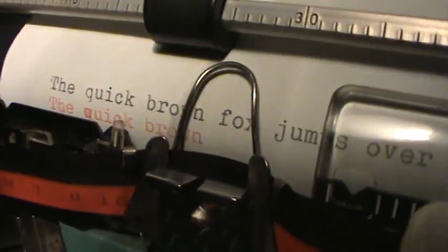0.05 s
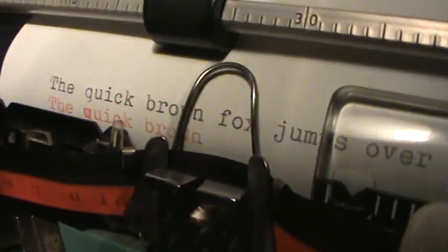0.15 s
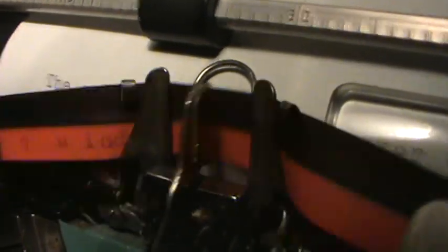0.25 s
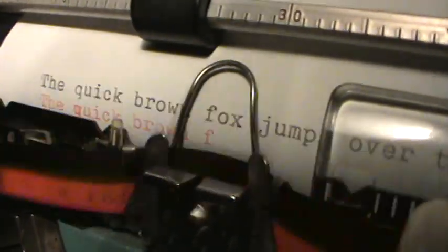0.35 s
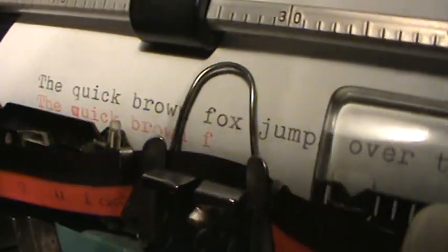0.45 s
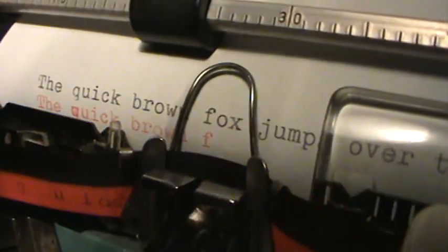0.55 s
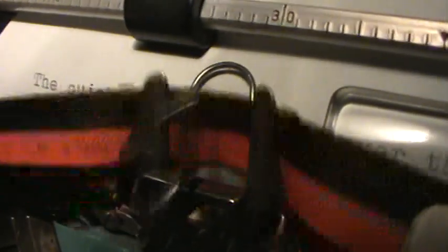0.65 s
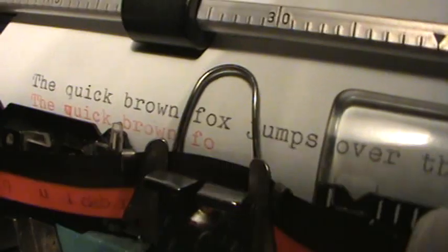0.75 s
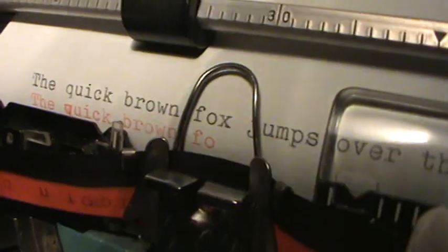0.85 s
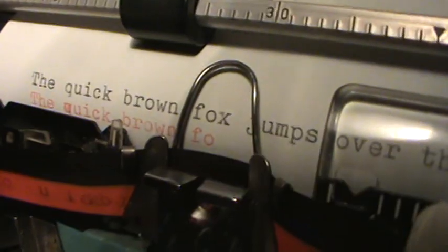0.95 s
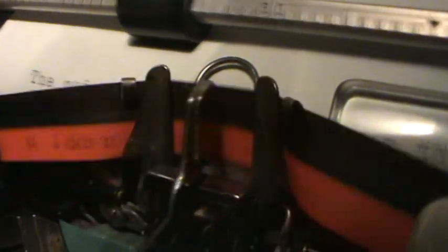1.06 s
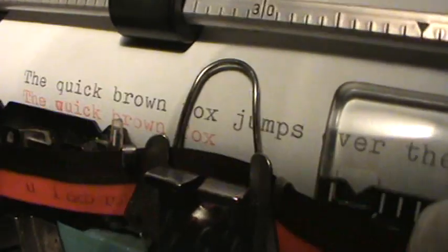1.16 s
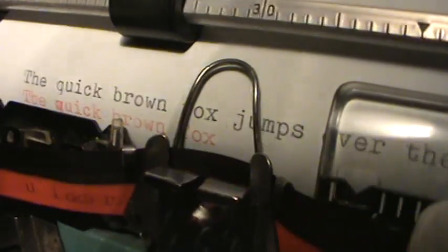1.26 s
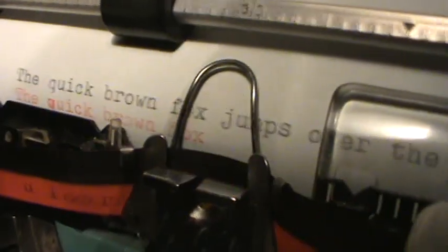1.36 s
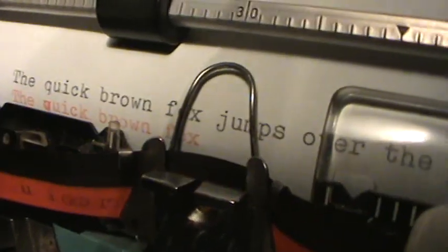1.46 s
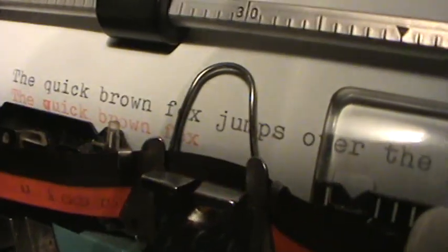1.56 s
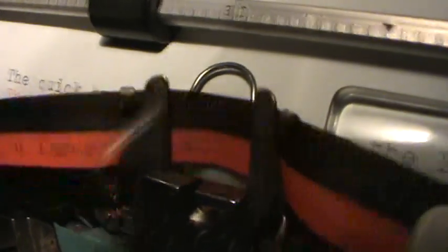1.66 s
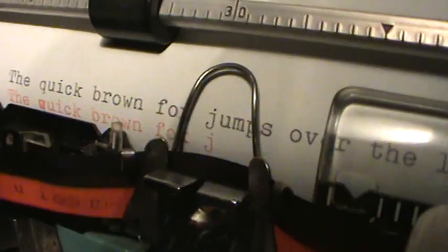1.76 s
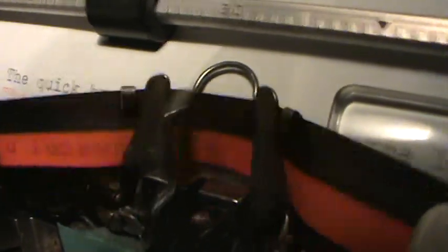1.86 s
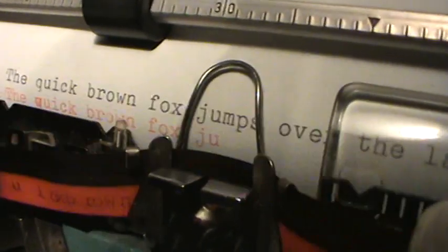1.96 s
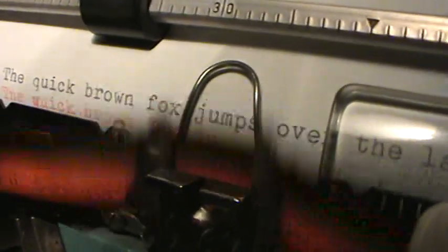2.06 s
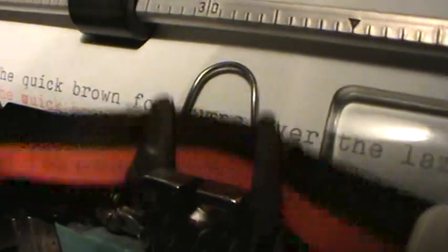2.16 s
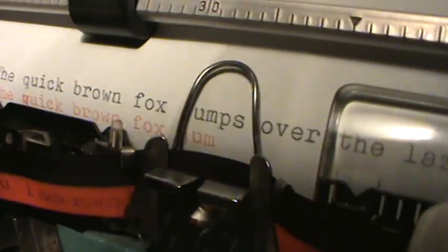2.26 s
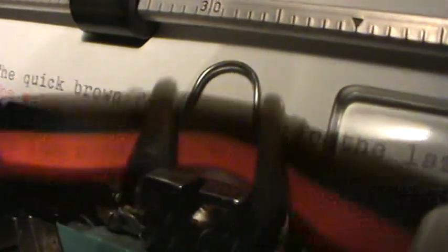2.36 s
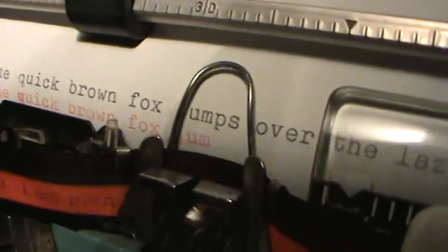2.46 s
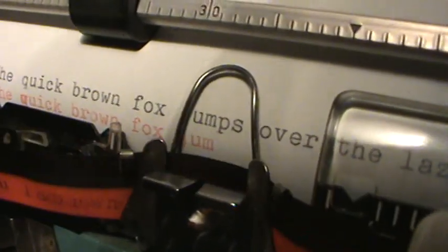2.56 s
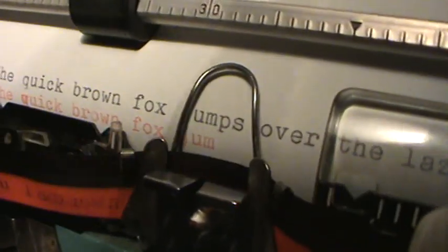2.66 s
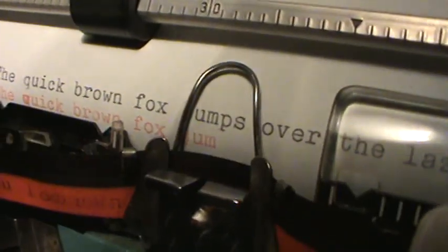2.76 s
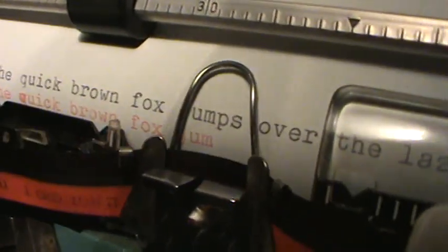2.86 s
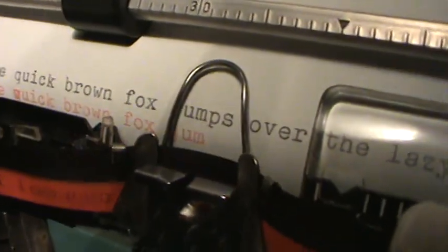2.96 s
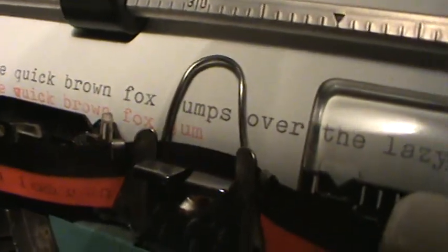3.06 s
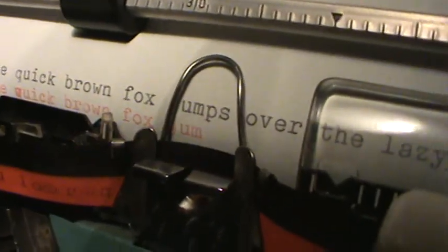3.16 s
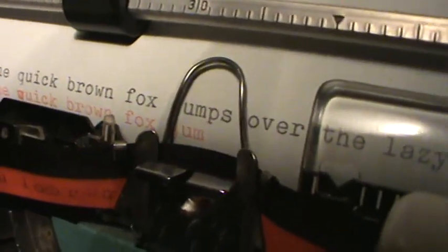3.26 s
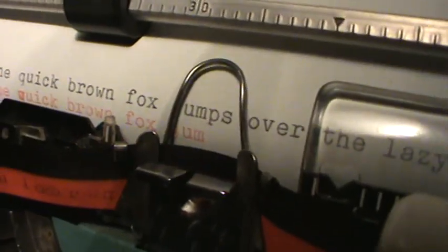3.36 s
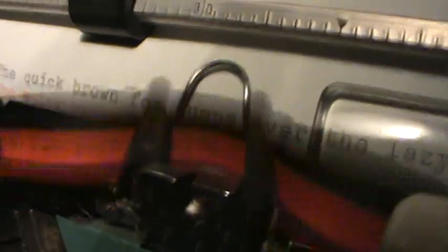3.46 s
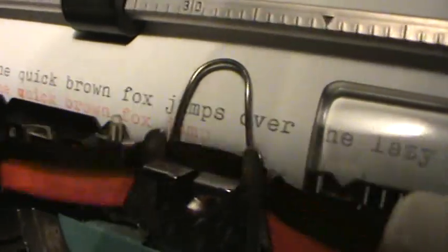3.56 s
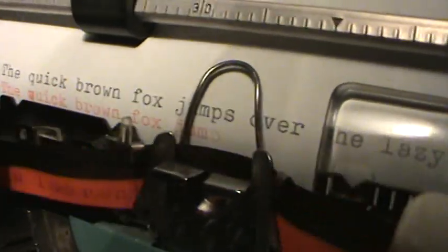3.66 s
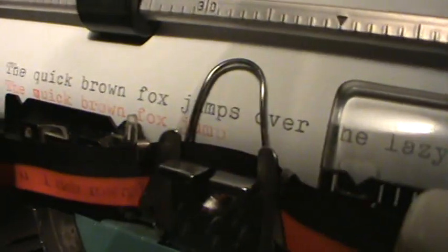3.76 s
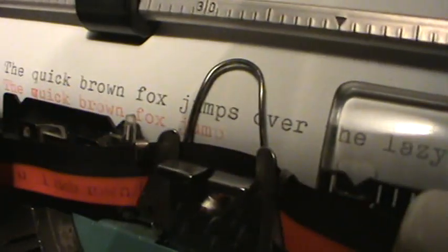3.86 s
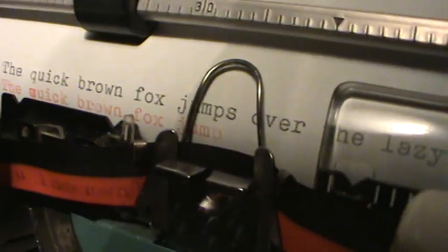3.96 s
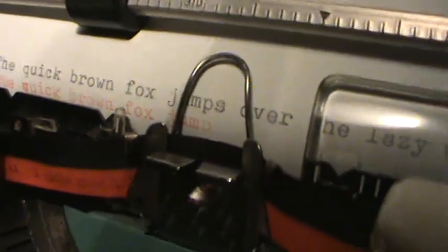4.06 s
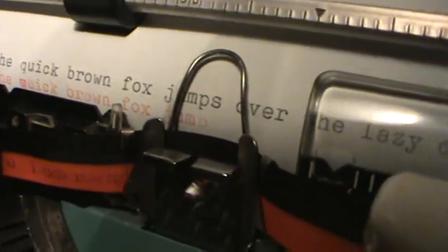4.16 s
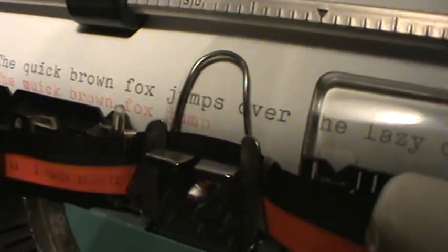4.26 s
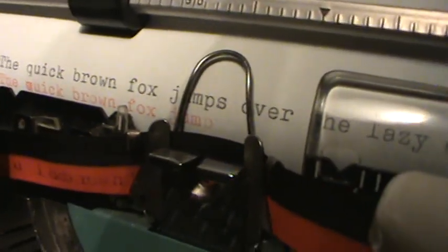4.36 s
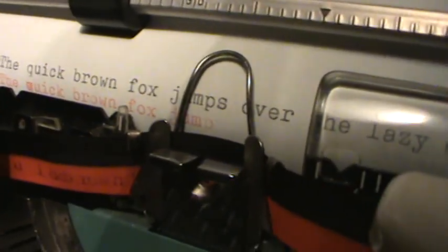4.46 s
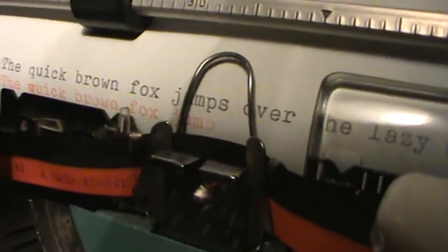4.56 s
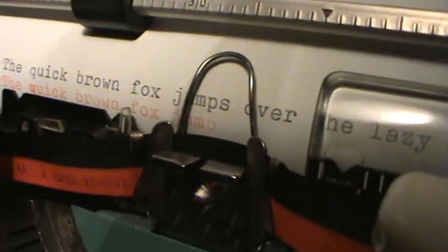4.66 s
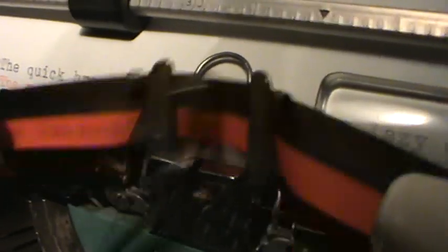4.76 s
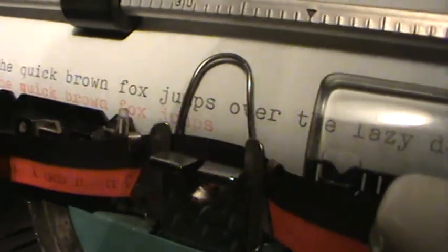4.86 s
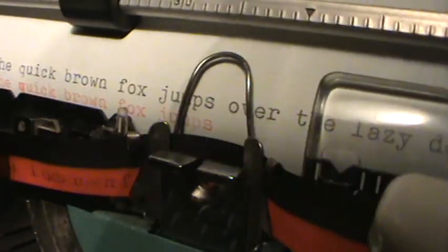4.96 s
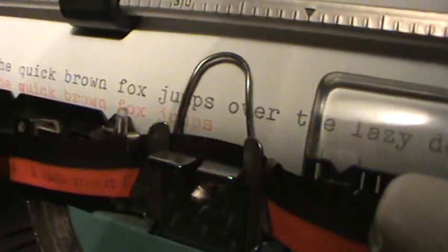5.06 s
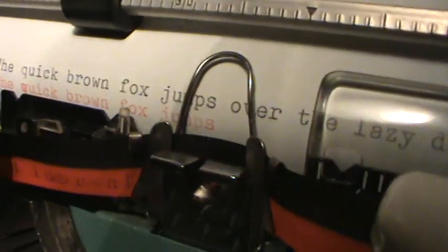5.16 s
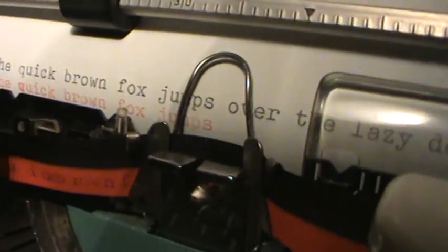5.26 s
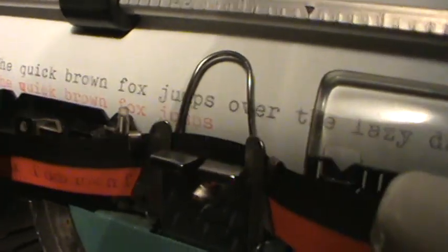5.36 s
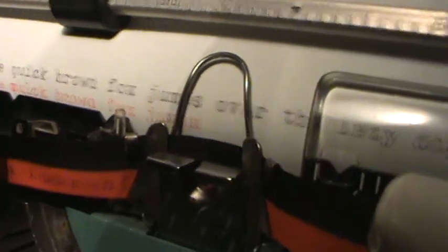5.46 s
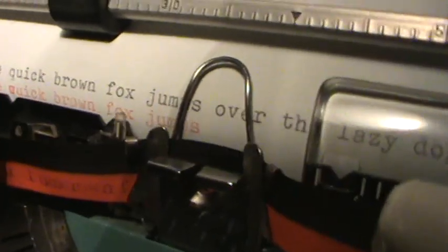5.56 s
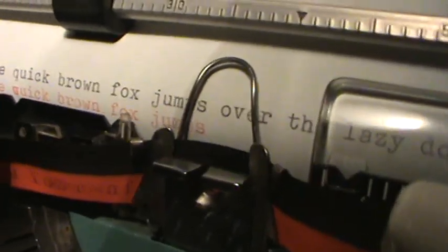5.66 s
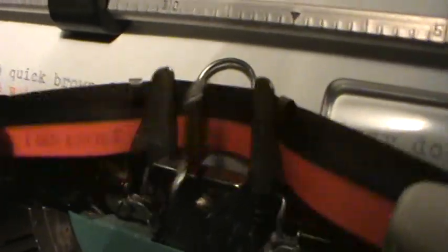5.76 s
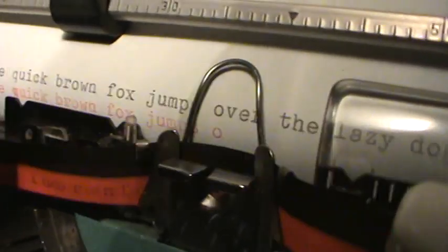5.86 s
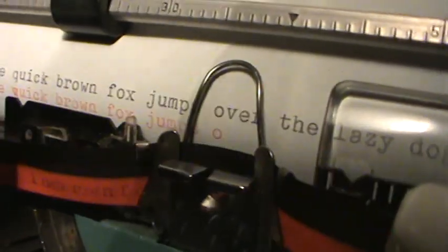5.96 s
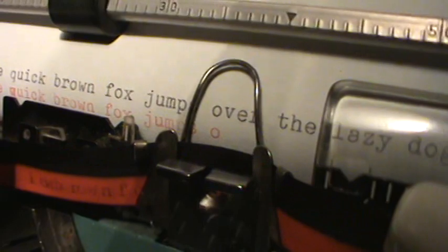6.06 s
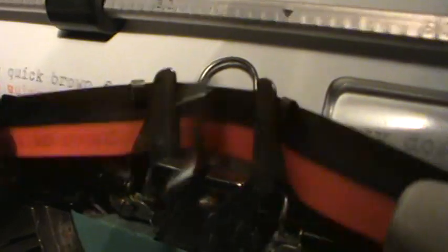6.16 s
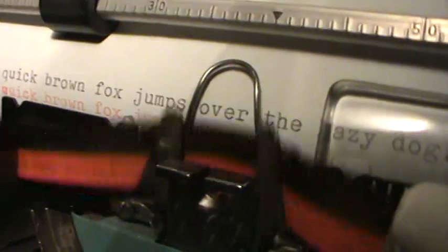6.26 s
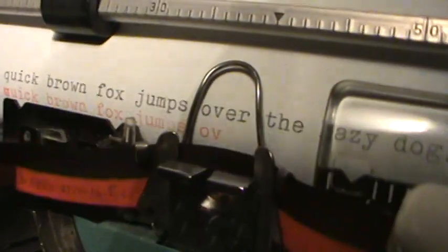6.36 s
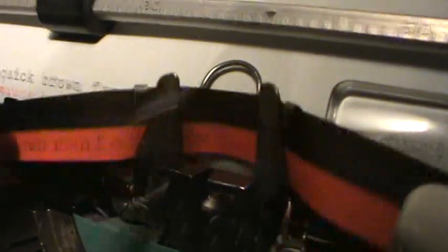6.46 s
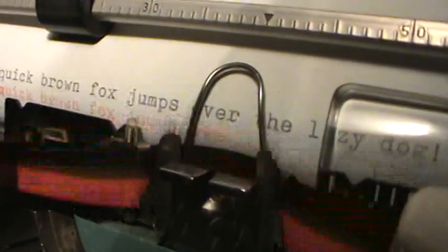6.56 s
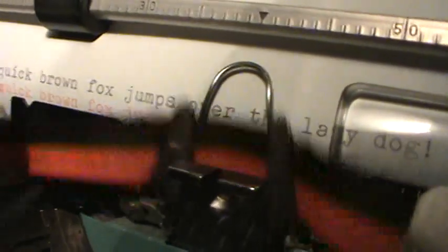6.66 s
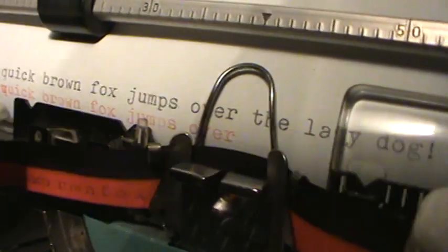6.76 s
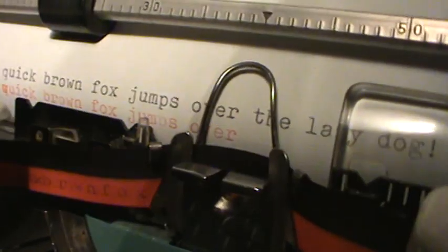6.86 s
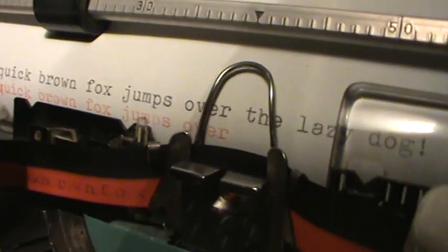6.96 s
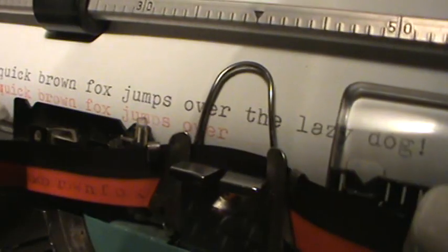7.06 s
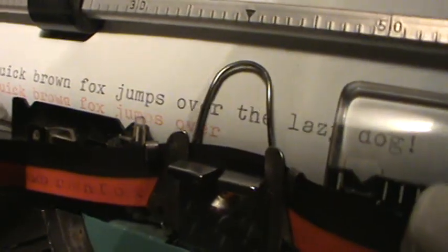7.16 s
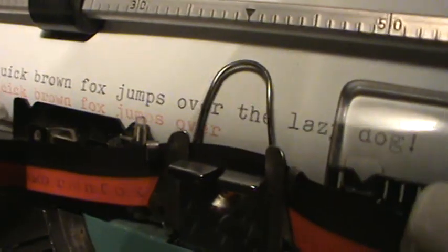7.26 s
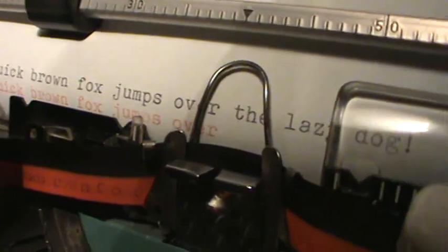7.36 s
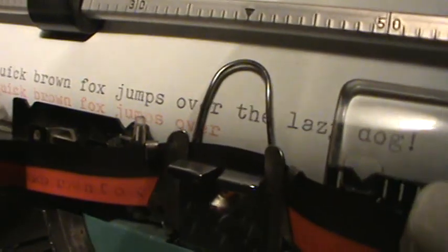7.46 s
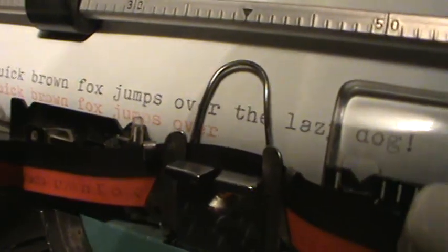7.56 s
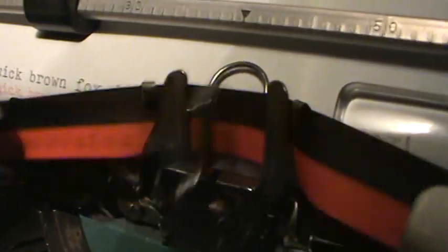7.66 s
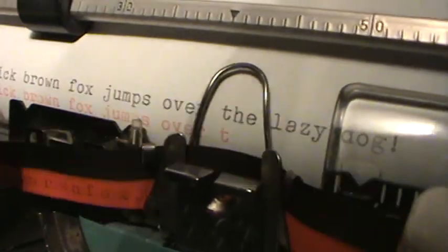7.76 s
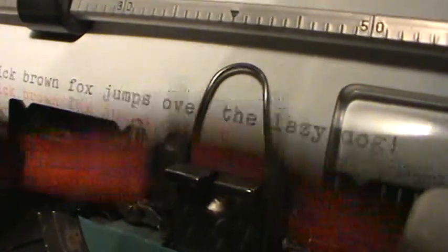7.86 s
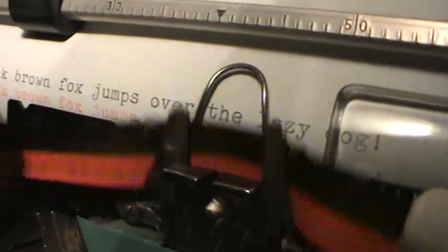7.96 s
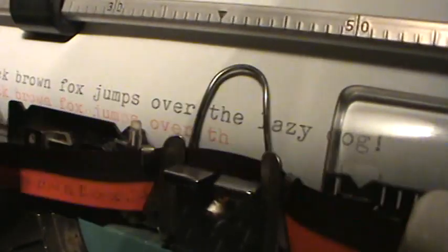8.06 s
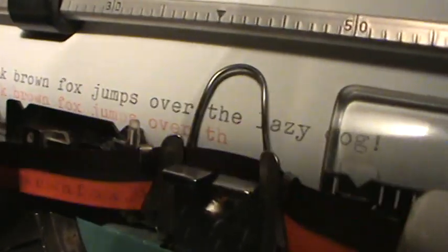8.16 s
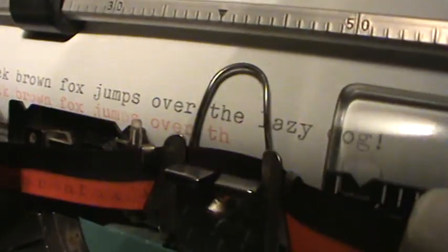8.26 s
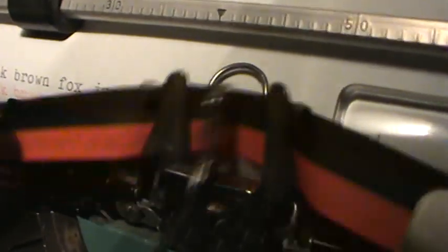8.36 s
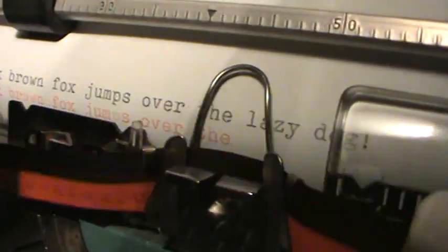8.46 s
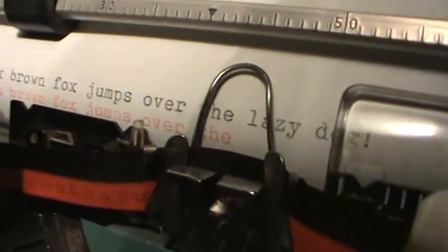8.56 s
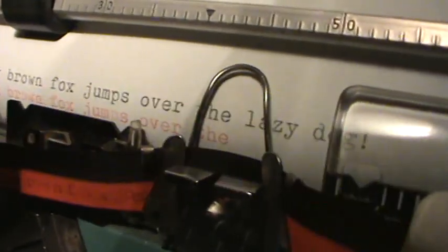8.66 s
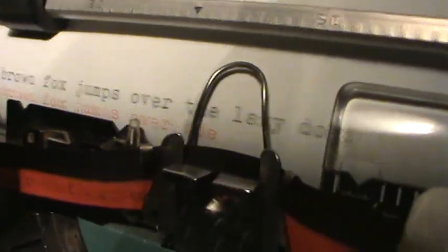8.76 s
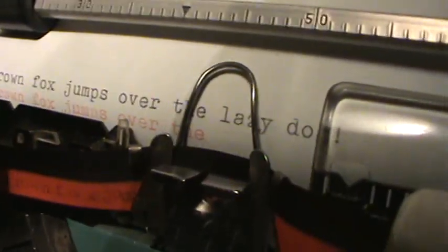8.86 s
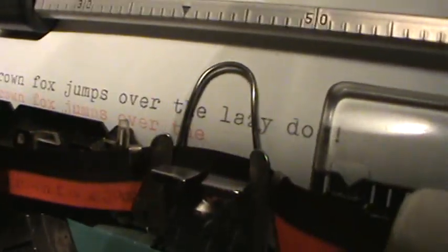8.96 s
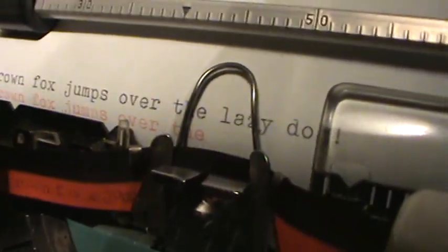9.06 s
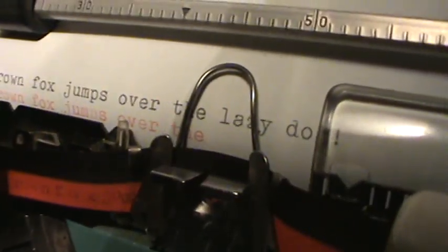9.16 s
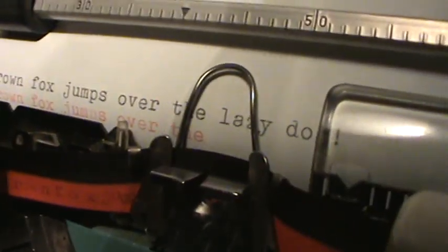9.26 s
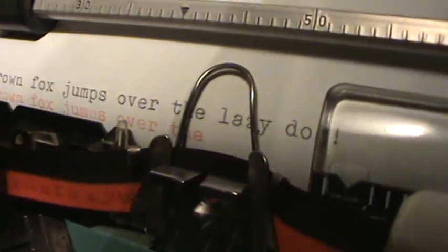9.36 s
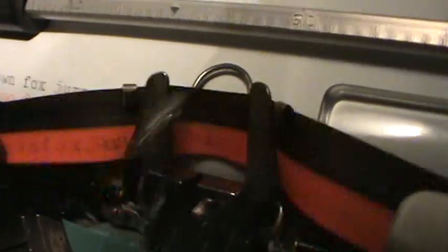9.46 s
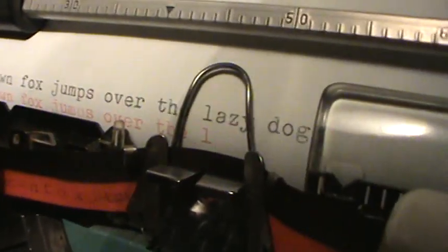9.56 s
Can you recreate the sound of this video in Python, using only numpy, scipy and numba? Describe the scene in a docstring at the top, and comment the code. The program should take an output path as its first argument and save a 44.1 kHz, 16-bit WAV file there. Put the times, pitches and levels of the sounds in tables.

```python
"""Slow typing on a manual typewriter, heard close up in a small room, over a low hum and faint steady ticks.
From the start, letters rattle the key linkage, slap the platen and drop the typebar; the carriage clicks along.
The first space soon thumps the frame. Then come loose clicks, soft slides, a faint spring tone and light taps,
and the typing goes on to the end. Blows are shaped noise with clear ringing tones, the hum is sines over air
noise, the ticks are noise bursts. A limiter holds the loud blows down."""
import sys
import numpy as np
from scipy import signal
from scipy.fft import rfft, irfft, next_fast_len
from scipy.io import wavfile
from numba import njit

SR = 44100
rng = np.random.default_rng(int(sys.argv[2]) if len(sys.argv) > 2 else 0)


def store_wav(level_fs):
    """Save 16-bit WAV to argv[1]."""
    pcm = np.round(np.clip(np.atleast_2d(level_fs), -1, 1) * 32767)
    wavfile.write(sys.argv[1], SR, pcm.T.astype(np.int16))


N = 424241  # length of the scene in samples


def typewriter():
    """The parts of the machine and the desk under it, each with its own weight and looseness, struck by their
    own contacts."""
    # colour of each part's noise, as (frequency [Hz], relative level [dB])
    key_colour = [(40, -7.5), (110, 11), (250, 0), (400, -4.5), (750, -7.5), (1400, -5), (2300, 1.5),
                  (4200, -5.5), (7000, -3.5), (11000, -4), (16000, -9.5)]
    strike_colour = [(40, -19.5), (90, 2), (150, 0), (250, 0.5), (380, -4.5), (650, 4.5), (1200, 2.5),
                     (2000, 0), (3100, 2.5), (6000, 0), (10000, -1), (16000, -10)]
    return_colour = [(40, -7), (90, 6), (300, 5), (700, -2.5), (1000, 6), (2000, 1.5), (4500, 5),
                     (8000, 1.5), (12000, 0), (16000, -5)]
    thump_colour = [(40, -18.5), (80, 3.5), (150, 0.5), (290, 2.5), (380, -9), (570, 4), (800, -6.5),
                    (1200, -10), (1500, -8.5), (2300, -18.5), (8000, -28), (16000, -43)]
    click_colour = [(60, -13), (400, 1), (1200, 1), (3000, -0.5), (5800, -0.5), (7700, -1.5), (9500, 0.5),
                    (16000, -21)]
    tap_colour = [(50, -6), (110, 7), (190, 8), (330, -1.5), (600, -6), (1100, -1.5), (1700, -2.5),
                  (2500, -11), (5000, -18), (16000, -33)]
    # what each part rings with: (frequency [Hz], relative level [dB], time to fall 60 dB at length factor 1 [s])
    key_modes = [(2210, -39, 0.17), (2440, -30, 0.03), (3140, -11, 0.097), (5830, -16, 0.086),
                 (6540, -7.5, 0.13), (9360, -9.5, 0.1), (10800, -12.5, 0.039)]
    platen_modes = [(147.3, -18.5, 0.57), (699, -33.5, 0.13), (917, -17.5, 0.15), (1055, -24.5, 0.4),
                    (1490, -22.5, 0.31), (1690, -20, 0.19), (4870, -32, .1), (12800, -16, 0.074)]
    typebar_modes = [(991, -21, 0.14), (1560, -28.5, 0.2), (3230, -25.5, 0.13), (4330, -19, 0.031),
                     (5500, -22.5, 0.049), (9570, -15.5, 0.056), (11900, -20, 0.049), (12900, -42, 0.17)]
    frame_modes = [(141, -8.5, 0.43), (284.6, -11.5, 0.16), (515, -12, 0.16), (578, -12, 0.087),
                   (902, -17, 0.28), (1480, -22, 0.14)]
    pawl_modes = [(5850, -21, .05)]
    desk_modes = [(184, -10, 0.09), (1740, -19.5, .04)]
    # fingers stir loose levers between strokes:
    # (time [s], level before the part's gain [dB], tilt [dB per octave], rattle length factor)
    loose_clicks = [(2.524, -32.5, -2, 0.53), (2.926, -45.5, -0.5, 0.97), (3.112, -44, -1, 1.0),
                    (4.119, -24.5, -6.5, 0.71), (8.171, -28.5, 0.5, 0.93), (8.264, -31.5, -3.5, 0.85),
                    (8.309, -34, -0.5, 0.76), (9.023, -32.5, 1.5, 0.52)]
    # light dry knocks on the desk, in the same columns
    desk_knocks = [(3.8, -37, -1.5, 0.83), (4.119, -23, 0, 1), (4.171, -29, -3.5, .8)]
    # how much the side differs from the middle: (frequency [Hz], side against mid [dB])
    side_spread = [(60, -6), (110, -21.5), (200, -8.5), (380, -6), (700, -12.5), (1300, -5), (2400, -4),
                   (4400, -4), (8100, -4.5), (15000, -10)]

    keys = blows(contacts("key"), key_colour, key_modes,
                 gain_db=37.0, seat_s=0.0069, crack_t60=0.051,
                 hold_s=0.03, rattle_s=0.09, rattle_db=6, ring_t60=0.38, ring_db=-4,
                 bass_t60=0.12, bass_db=-20.5, modes_db=-9.0)
    slugs = blows(contacts("slug", "rebound"), strike_colour, platen_modes,
                  gain_db=40.5, seat_s=0.00058, crack_t60=0.025,
                  hold_s=0.028, rattle_s=0.13, rattle_db=5.0, ring_t60=0.23, ring_db=3.0,
                  bass_t60=0.3, bass_db=-6.5, modes_db=-0.5)
    bars = blows(contacts("landing"), return_colour, typebar_modes,
                 gain_db=30.5, seat_s=0.0026, crack_t60=0.073,
                 hold_s=0.019, rattle_s=0.055, rattle_db=2.5, ring_t60=0.16, ring_db=-10,
                 bass_t60=0.18, bass_db=-12, modes_db=5.0)
    thumps = contacts("touch", "stop", "jolt", "lift", "release", "bounce")
    frame = blows(thumps, thump_colour, frame_modes,
                  gain_db=32, seat_s=0.0022, crack_t60=0.018,
                  hold_s=0.029, rattle_s=0.1, rattle_db=1.5, ring_t60=0.2, ring_db=-1.5,
                  bass_t60=0.15, bass_db=-10.5, modes_db=-2.5)
    clicks = contacts("guide", "step", "settle", "touch click", "stop click", "carriage", "catch")
    pawl = blows(clicks + loose_clicks, click_colour, pawl_modes,
                 gain_db=26.5, seat_s=0.0026, crack_t60=0.012,
                 hold_s=0.005, rattle_s=0.049, rattle_db=0, ring_t60=0.24, ring_db=-11,
                 bass_t60=0.25, bass_db=-13.5, modes_db=-22)
    desk = blows(desk_knocks, tap_colour, desk_modes,
                   gain_db=34.0, seat_s=0.0014, crack_t60=0.019,
                   hold_s=0.011, rattle_s=0.037, rattle_db=-4.5, ring_t60=0.05, ring_db=-3.5,
                   bass_t60=0.044, bass_db=-8, modes_db=1.5)
    mid, side = keys + slugs + bars + frame + pawl + desk
    side = colour(side, side_spread)
    return np.array([mid + side, mid - side])


def contacts(*kinds):
    """All contacts of these kinds in the typing: (time [s], level [dB], tilt [dB/octave], length factor)."""
    # one letter each: (key pressed [s], slug hits [s], typebar lands [s], key level [dB],
    # slug level [dB], slug's rebound level [dB], escapement level [dB]); levels before the part's gain
    letters = [(0.233, 0.272, 0.395, -19.5, -11, -21, -13), (0.608, 0.649, 0.748, -19.5, -14.5, -24, -16),
               (1.034, 1.074, 1.184, -20.5, -12.5, -22, -17), (1.613, 1.657, 1.765, -21.5, -14, -20, -34),
               (1.839, 1.878, 1.983, -19, -15, -17, -34), (2.079, 2.123, 2.236, -20.5, -16.5, -22, -32),
               (2.359, 2.384, 2.473, -24, -17, -34, -17), (3.466, 3.490, 3.593, -21, -8, -13, -13),
               (4.756, 4.793, 4.882, -20.5, -13, -21, -30), (5.719, 5.764, 5.866, -20.5, -11.5, -20, -12),
               (6.144, 6.191, 6.320, -23, -13, -20, -32), (6.420, 6.469, 6.563, -21.5, -13, -21, -25),
               (6.563, 6.629, 6.730, -17, -15, -23, -30), (7.654, 7.690, 7.795, -18, -13, -21, -32),
               (7.881, 7.922, 8.028, -19, -13.5, -20, -30), (8.353, 8.397, 8.487, -21, -14.5, -21, -28),
               (9.430, 9.471, 9.571, -19, -13.5, -21, -34)]
    # one space each: (bar pressed [s], reaches its stop after [s], back up after [s],
    # press level [dB], release level [dB]); levels before the part's gain
    spaces = [(1.289, 0.014, 0.11, -15.5, -10), (5.375, .019, 0.12, -17, -9), (6.891, .064, .295, -29, -16),
              (8.699, 0.027, 0.1, -19.5, -14)]
    # how each kind of contact sounds: name: (tilt [dB per octave], rattle length factor)
    contact_sound = {"key": (-0.4, 0.8), "guide": (5.5, 0.3), "slug": (0.1, 0.87), "rebound": (-0.3, 0.55),
                     "landing": (0.6, 0.78), "step": (5.2, 0.93), "settle": (-1.1, 0.835),
                     "touch": (4.2, 0.814), "touch click": (-4.5, 0.9), "stop": (0.4, 0.9),
                     "stop click": (3.5, 0.9), "carriage": (2, 0.9), "jolt": (0, 1.0), "catch": (0.2, 0.85),
                     "lift": (4, 1.0), "release": (0.35, 0.85), "bounce": (-1, 0.74)}

    strokes = [letter(*row) for row in letters] + [space(*row) for row in spaces]
    events = []
    for stroke in strokes:
        for kind, s, db, loose in stroke:
            if kind in kinds:
                tilt, stretch = contact_sound[kind]
                events.append((s, db, tilt, loose * stretch))
    return events


def letter(s, hit, landed, key_db, slug_db, rebound_db, step_db):
    """The key drives the typebar, the slug hits and bounces, the carriage steps, the bar lands.

    Gives (contact, time [s], level [dB], looseness).
    """
    guide_lead_s, guide_db = 0.0085, -10  # the typebar ticks through its guide just before the paper
    rebound_s = 0.031  # the slug bounces once on the platen
    step_lead_s = 0.04  # the falling typebar trips the escapement this long before it lands
    landing_db = -16  # it falls back by its spring, however hard the key was hit
    settle_s, settle_db = 0.198, -40  # the key lever clicks home this long after the slug's blow
    usual_flight_s, snap = 0.043, 0.4  # a quicker stroke rattles for less time, by this power
    flight_s = max(hit - s, 0.01)
    loose = (flight_s / usual_flight_s) ** snap
    return [("key", s, key_db, loose),
            ("guide", hit - guide_lead_s, guide_db, 1),
            ("slug", hit, slug_db, loose),
            ("rebound", hit + rebound_s, rebound_db, 1),
            ("step", landed - step_lead_s, step_db, 1),
            ("landing", landed, landing_db, 1),
            ("settle", hit + settle_s, settle_db, 1)]


def space(s, stop_s, up_s, press_db, release_db):
    """The bar is touched, hits its stop, frees the carriage and springs back against the frame.

    Gives (contact, time [s], level [dB], looseness).
    """
    touch_db, touch_click_db = -6, -15  # the finger meets the bar: against the press level
    stop_click_db = -4  # the bar's linkage clicks at the stop: against the press level
    # the carriage steps and jolts the frame, always with the force of its own spring
    carriage_s, carriage_db, jolt_db = 0.027, -16, -27
    # the rising bar catches the pawl at this share of the stroke: against the release level
    catch_share, catch_db, lift_db = 0.9, -9.5, -13
    bounce_s, bounce_db = 0.035, -14  # the bar bounces once: against the release level
    down = s + stop_s
    freed = down + carriage_s
    caught = s + catch_share * up_s
    up = s + up_s
    return [("touch", s, press_db + touch_db, 1),
            ("touch click", s, press_db + touch_click_db, 1),
            ("stop", down, press_db, 1),
            ("stop click", down, press_db + stop_click_db, 1),
            ("carriage", freed, carriage_db, 1),
            ("jolt", freed, jolt_db, 1),
            ("catch", caught, release_db + catch_db, 1),
            ("lift", caught, release_db + lift_db, 1),
            ("release", up, release_db, 1),
            ("bounce", up + bounce_s, release_db + bounce_db, 1)]


def blows(events, spectrum, modes, gain_db, seat_s, crack_t60, hold_s, rattle_s, rattle_db,
          ring_t60, ring_db, bass_t60, bass_db, modes_db):
    """Each blow is a crack, a rattle, a dense ring and a bass, with a few clear modes; rows are mid and side."""
    out = np.zeros((2, N + SR))
    size = 16384  # samples in one blow
    t = np.arange(size) / SR
    low = signal.butter(2, 420, fs=SR, output="sos")
    rise = 1 - np.exp(-t / seat_s)  # the parts have play and take a moment to seat
    for s, db, tilt, stretch in events:
        age = t / max(stretch, 0.2)  # a looser part takes longer to settle
        crack = rng.standard_normal((2, size)) * rise * fade(t, crack_t60)
        crack = shade(crack, spread_db=1)
        chatter = [rattle(age, hold_s, rattle_s, clump_db=7.5, shade_db=5.5) for _ in range(2)]
        chatter = np.array(chatter) * rise
        ring = rng.standard_normal((2, size)) * rise * fade(age, ring_t60)
        # the low resonances start late
        late_rise = 1 - np.exp(-t / 0.035)
        bass = signal.sosfilt(low, rng.standard_normal((2, size))) * late_rise * fade(age, bass_t60)
        body = unit(crack) + undb(rattle_db) * unit(chatter)
        body = body + undb(ring_db) * unit(ring) + undb(bass_db) * unit(bass)
        body = shade(body, spread_db=1.5, count=220)  # each blow gets a slight random colour of its own
        sound = unit(colour(body, spectrum, tilt))
        for hz, mode_db, t60 in modes:
            phase = rng.uniform(0, 2 * np.pi, (2, 1))
            detune = 1 + 0.0022 * rng.standard_normal()
            luck_db = 2.54 * rng.standard_normal()
            tone = np.sin(2 * np.pi * hz * detune * t + phase) * rise * fade(age, t60)
            sound = sound + undb(modes_db + mode_db + luck_db) * unit(tone)
        start = int(s * SR)
        out[:, start:start + size] += undb(db + gain_db) * sound
    return out[:, :N]


def rattle(t, hold_s, t60, clump_db, shade_db, count=3):
    """Several loose parts chatter in clumps of tiny contacts while driven, then come to rest."""
    out = 0
    for _ in range(count):
        knots = np.arange(0, t[-1], 0.004)  # clumps change every 4 ms of the given time
        clumps = undb(clump_db * np.interp(t, knots, rng.standard_normal(len(knots))))
        happens = rng.random(len(t)) < 1500 / SR  # about 1500 contacts a second
        touches = happens * rng.standard_normal(len(t))
        rest = fade(np.maximum(t - hold_s, 0), t60)
        out = out + shade(touches * clumps * rest, shade_db)
    return unit(out)


def shade(x, spread_db, count=40):
    """A random smooth colour, drawn anew on each call."""
    size = x.shape[-1]
    padded = size + 2048
    hz = np.fft.rfftfreq(padded, 1 / SR)
    knots = np.linspace(0, np.sqrt(SR / 2), count)  # closer together in the bass
    db = np.interp(np.sqrt(hz), knots, spread_db * rng.standard_normal(count))
    return irfft(rfft(x, padded) * undb(db))[..., :size]


def slides():
    """Soft friction: bands of noise that swell and die away."""
    # carriage and paper slide faintly: (time [s], length [s], centre frequency [Hz], level before swell [dB])
    slide_rows = [(2.932, 0.26, 10000, -64), (4.053, .09, 10000, -55), (4.445, 0.032, 1700, -54.5),
                  (9.209, 0.14, 1190, -44.5)]
    out = np.zeros((2, N))
    for s, length, hz, db in slide_rows:
        size, start = int(length * SR), int(s * SR)
        rub = colour(stereo_noise(size, 0.57), [(hz / 4, -16), (hz, 0), (hz * 4, -32)])
        swell = np.sqrt(np.hanning(size))
        rub = undb(db) * rub / rub.std() * swell
        out[:, start:start + size] += rub[:, :N - start]
    return out


def spring(s, hz, db, t60):
    """A spring left singing faintly by one hard stroke: a single fading sine."""
    t = np.maximum(np.arange(N) / SR - s, 0)
    return undb(db) * np.sin(2 * np.pi * hz * t) * fade(t, t60)


def room(x, t60, wet_db):
    """Desk and near walls answer with a short diffuse tail of fading noise."""
    t = np.arange(SR // 2) / SR
    tail = stereo_noise(len(t), 0.98) * fade(t, t60) * (1 - np.exp(-t / 0.002))
    tail = unit(colour(tail, [(100, 9), (1000, 12.0), (5000, 3.5), (16000, -21)]))
    return x + undb(wet_db) * signal.fftconvolve(x, tail, axes=1)[:, :N]


def hum(air_db, waver):
    """An appliance drones with slightly wavering tones over a low rush of air."""
    # mains hum and motor tones: (frequency [Hz], average level [dB])
    hum_tones = [(120, -39.5), (178, -56.5), (240, -64.5), (296, -60.5), (360, -55.5), (431, -52.5)]
    # colour of the air noise: (frequency [Hz], relative level [dB])
    air_colour = [(15, -62), (25, -25), (64, -8.5), (97, -9), (123, -5), (217, -17.5), (384, -19.5),
                  (427, -16.5), (489, -23), (887, -33), (1890, -39.5), (2760, -43), (2990, -44),
                  (5880, -44), (16000, -48.5)]
    t = np.arange(N) / SR
    air = colour(stereo_noise(N, 0.4), air_colour)
    out = undb(air_db) * air / air.std()
    knots = np.linspace(0, t[-1], num=70)
    for hz, db in hum_tones:
        swell = np.interp(t, knots, waver * rng.standard_normal(len(knots)))
        drift = np.interp(t, knots, waver * rng.standard_normal(len(knots)))  # phase [rad]
        phase = drift + rng.uniform(0, 2 * np.pi)
        out = out + np.sqrt(2) * undb(db) * (1 + swell) * np.sin(2 * np.pi * hz * t + phase)
    return out


def ticking(level_db, weak_db, first_s=0.0077):
    """A tiny mechanism close by ticks steadily with short noise bursts, strong and weak in turn."""
    tick_hz = 29.97  # ticks per second
    turns = (np.arange(N) / SR - first_s) * tick_hz
    index = np.floor(turns).astype(int)
    luck_db = 2 * rng.standard_normal(index.max() + 2)[index]
    beat_db = weak_db * (index % 2) + luck_db
    since_tick_s = turns % 1 / tick_hz
    ticks = stereo_noise(N, 1.0) * fade(since_tick_s, 0.044) * undb(beat_db)
    ticks = colour(ticks, [(1200, -16), (2000, -6), (2600, -2.5), (3300, -12), (5000, -15), (10000, -25)])
    return undb(level_db) * ticks / ticks.std()


def undb(db):
    """Turn decibels into a plain factor."""
    return 10 ** (np.asarray(db) / 20)


def unit(x):
    """Scale to an energy of one."""
    return x / np.sqrt(np.sum(x ** 2) + 1e-18)


def fade(t, t60):
    """Exponential decay that falls by 60 dB in the time t60."""
    return np.exp(-np.log(1000) * t / t60)


def stereo_noise(size, width):
    """Noise common to both sides plus a share that differs."""
    mid, side = rng.standard_normal((2, size))
    return np.array([mid + width * side, mid - width * side])


def colour(x, points, tilt=0):
    """Filter through (Hz, dB) points, tilted about 2 kHz, that never sounds before its input."""
    size = 2 * next_fast_len(x.shape[-1] // 2 + 2048)
    octave = np.log2(np.fft.rfftfreq(size, 1 / SR).clip(20) / 2000)
    hz, db = np.transpose(points)
    curve = np.interp(octave, np.log2(hz / 2000), db)
    curve = curve + tilt * np.maximum(octave, -3)  # the tilt stops growing below 250 Hz
    # folding the cepstrum (the spectrum of the log curve) forward in time gives minimum phase
    cepstrum = irfft(np.log(undb(curve)))
    cepstrum[1:size // 2] *= 2
    cepstrum[size // 2 + 1:] = 0
    return irfft(rfft(x, size) * np.exp(rfft(cepstrum)))[..., :x.shape[-1]]


@njit
def follow(x, attack, release):
    """Envelope that rises fast and falls slowly."""
    out, level = np.empty(len(x)), 0.
    for i in range(len(x)):
        level += (x[i] - level) * (attack if x[i] > level else release)
        out[i] = level
    return out


def limit(x, ceiling_db, attack_s, release_s):
    """Loud blows pull the gain down; it recovers as they ring out."""
    attack = 1 - np.exp(-1 / (attack_s * SR))
    release = 1 - np.exp(-1 / (release_s * SR))
    envelope = follow(np.abs(x).max(axis=0), attack, release)
    return x / np.maximum(1, envelope / undb(ceiling_db))


def scene():
    """The machine with its room tail, over the hum and the ticking."""
    machine = typewriter() + slides() + spring(s=3.62, hz=1310, db=-39, t60=0.47)
    in_room = room(machine, t60=0.27, wet_db=-17.0)
    return in_room + hum(air_db=-45.5, waver=0.2) + ticking(level_db=-62, weak_db=-3)


def record(dry):
    """Limiter, soft overload and a steep top cut."""
    top_hz = 15900
    limited = limit(dry, ceiling_db=-8.0, attack_s=0.00019, release_s=0.013)
    held = np.tanh(limited)
    top_cut = signal.ellip(10, 0.2, 80, top_hz, fs=SR, output="sos")
    return signal.sosfilt(top_cut, held)


dry = scene()
out = record(dry)
store_wav(out)
```